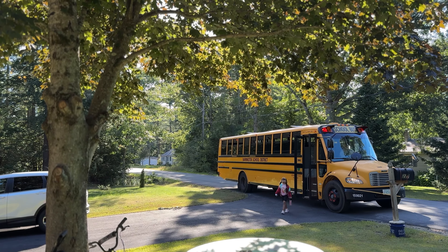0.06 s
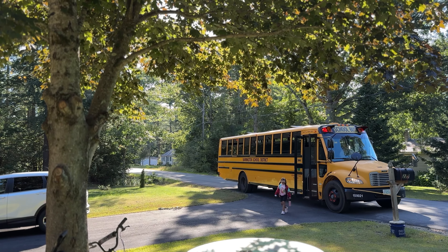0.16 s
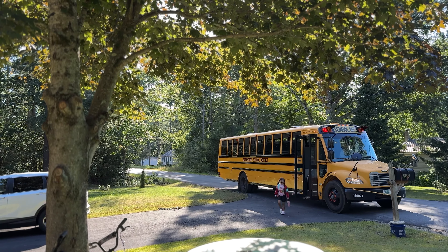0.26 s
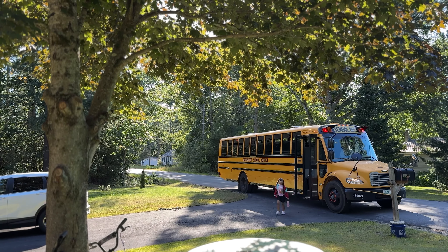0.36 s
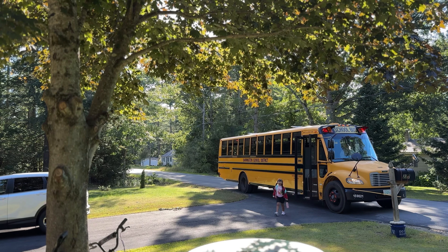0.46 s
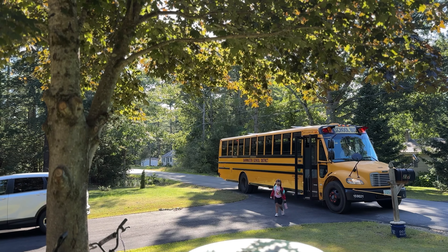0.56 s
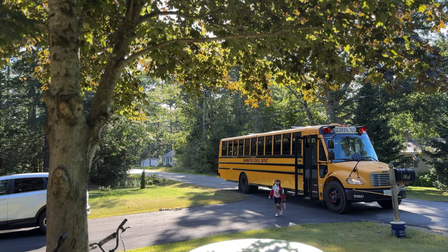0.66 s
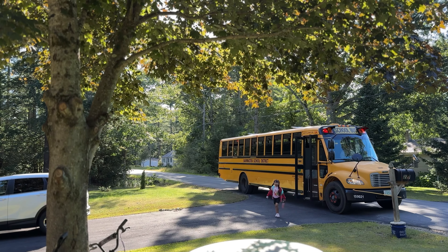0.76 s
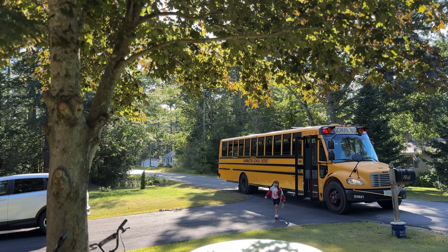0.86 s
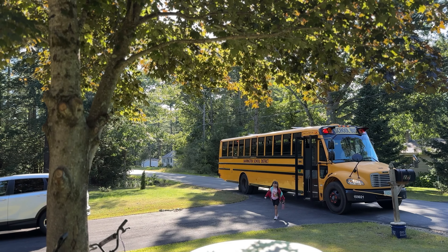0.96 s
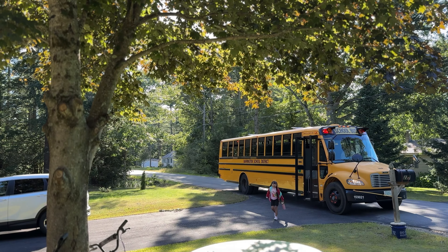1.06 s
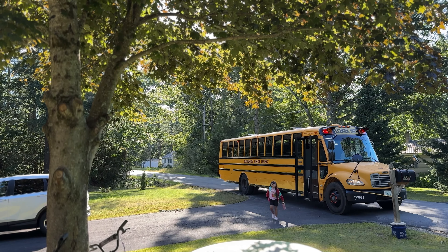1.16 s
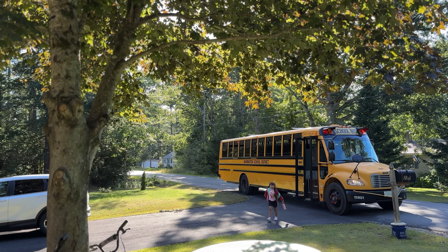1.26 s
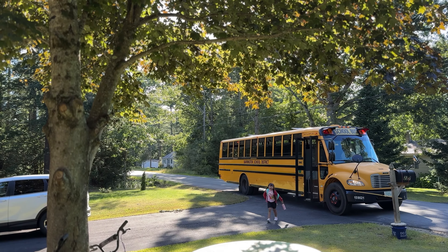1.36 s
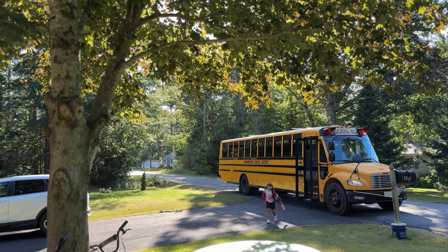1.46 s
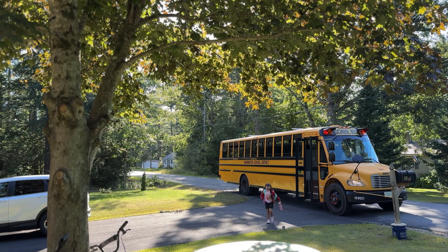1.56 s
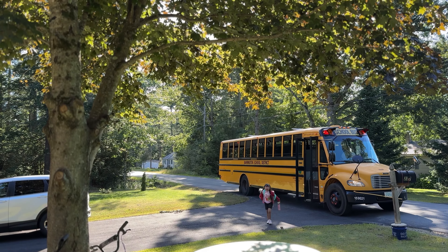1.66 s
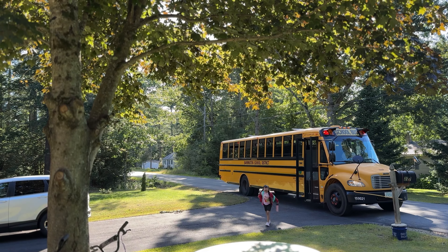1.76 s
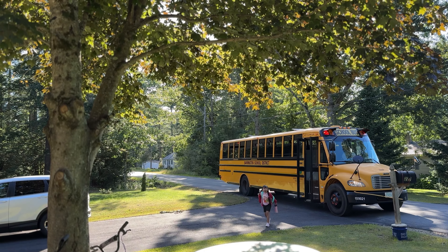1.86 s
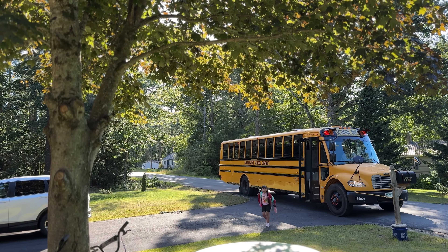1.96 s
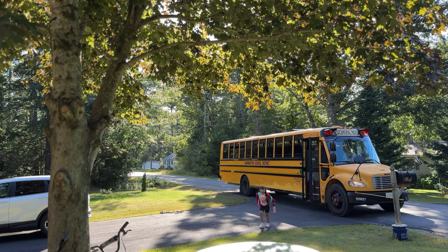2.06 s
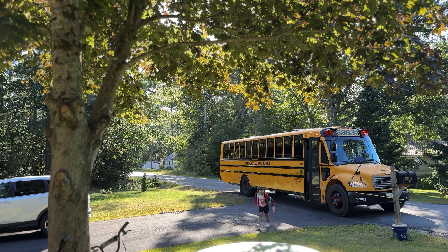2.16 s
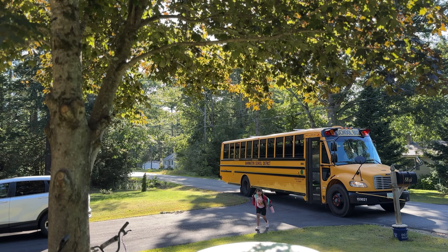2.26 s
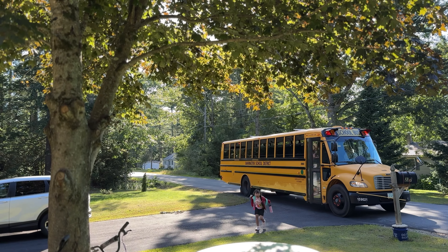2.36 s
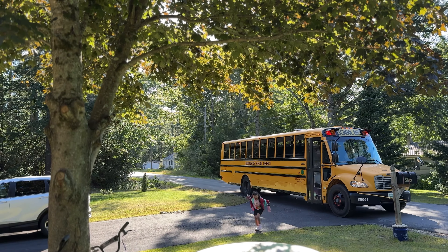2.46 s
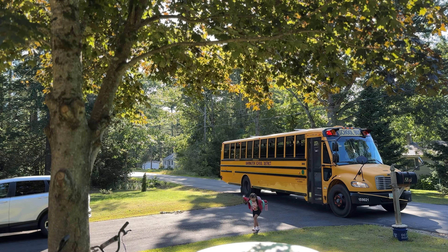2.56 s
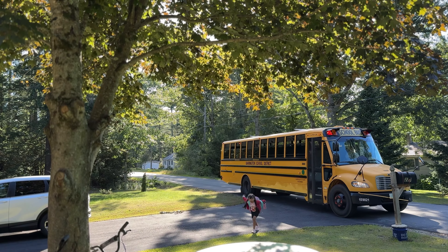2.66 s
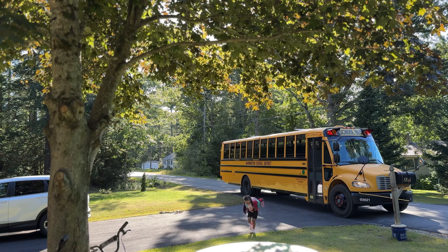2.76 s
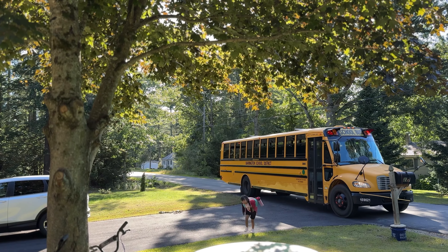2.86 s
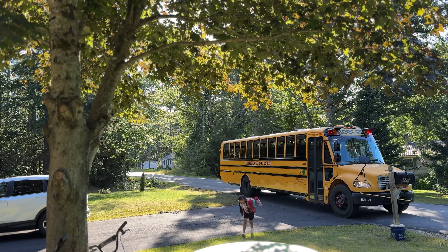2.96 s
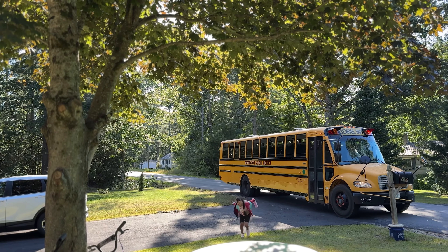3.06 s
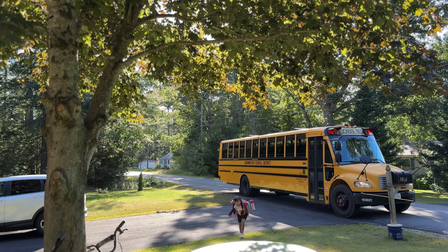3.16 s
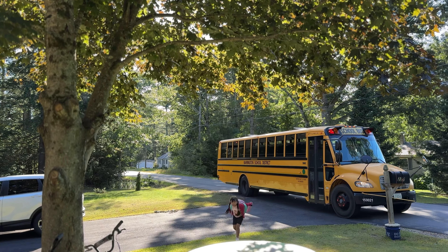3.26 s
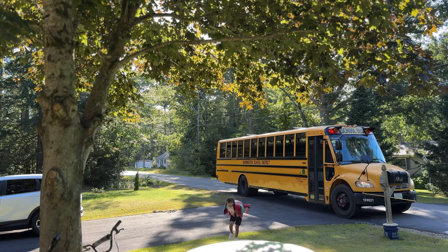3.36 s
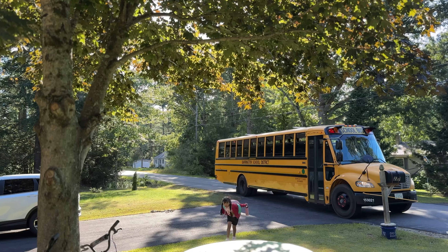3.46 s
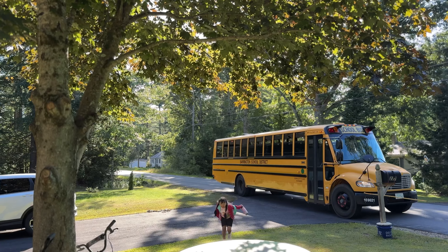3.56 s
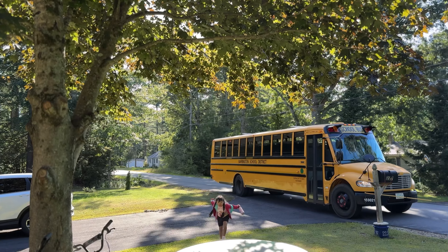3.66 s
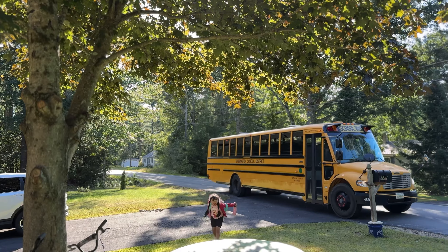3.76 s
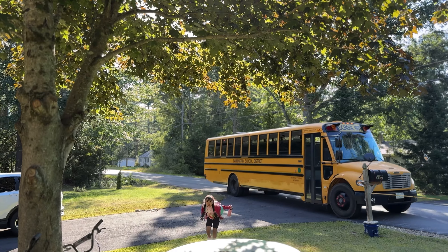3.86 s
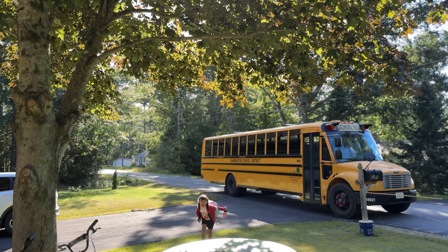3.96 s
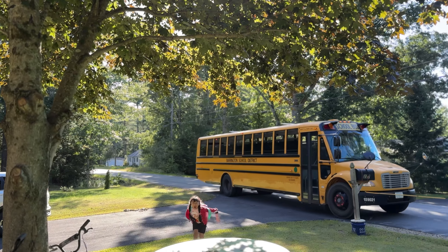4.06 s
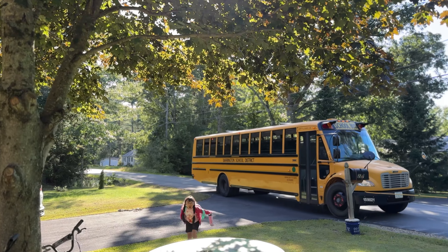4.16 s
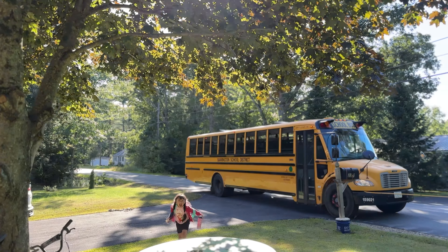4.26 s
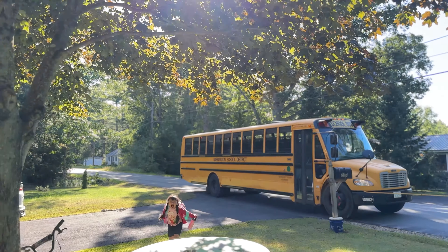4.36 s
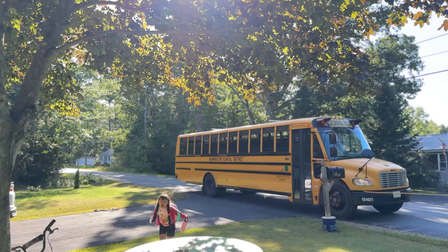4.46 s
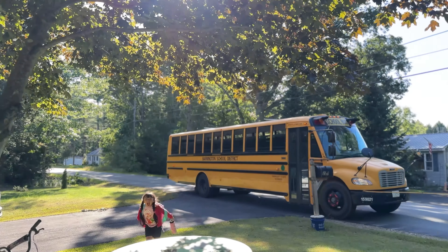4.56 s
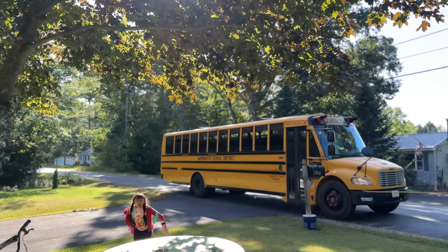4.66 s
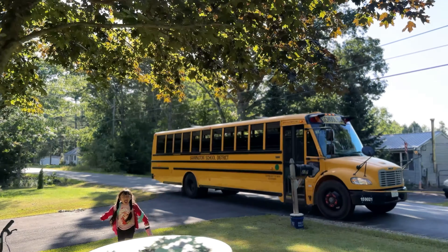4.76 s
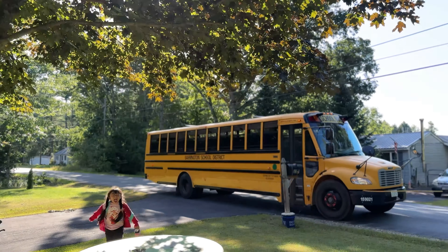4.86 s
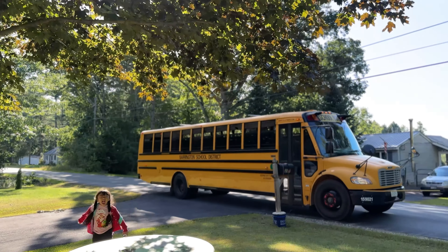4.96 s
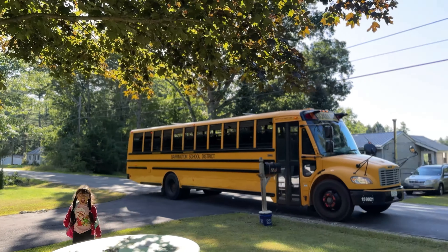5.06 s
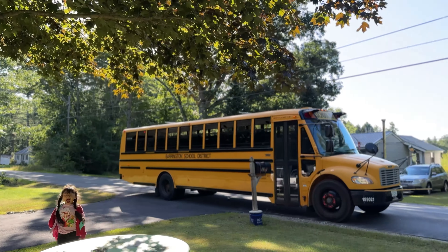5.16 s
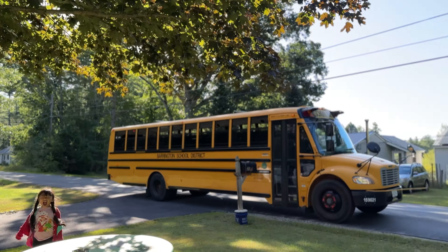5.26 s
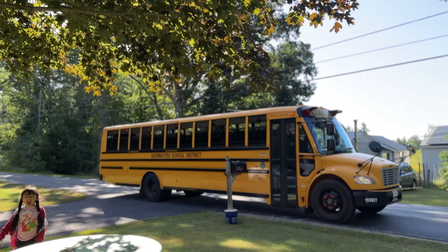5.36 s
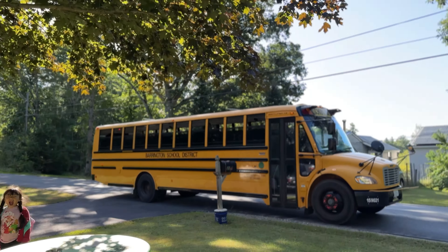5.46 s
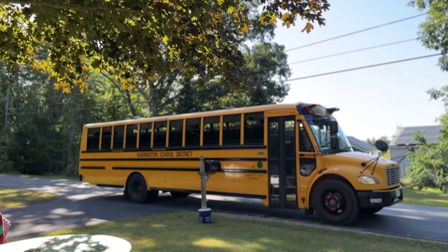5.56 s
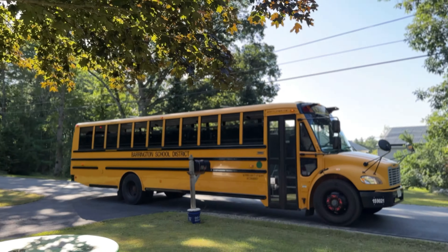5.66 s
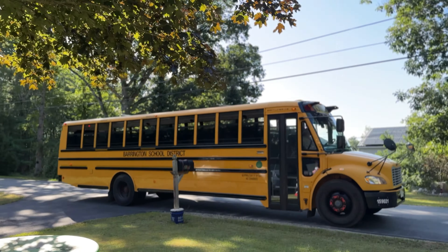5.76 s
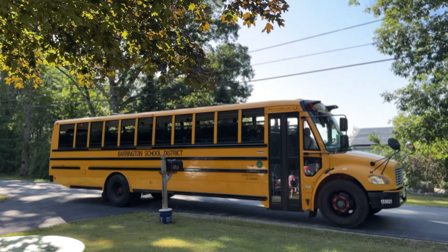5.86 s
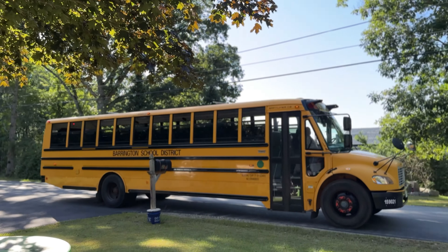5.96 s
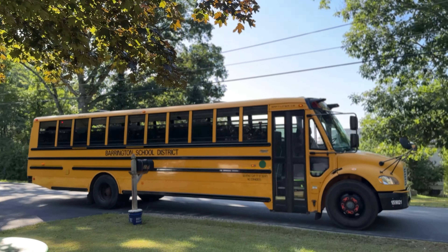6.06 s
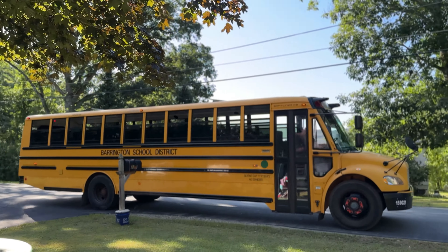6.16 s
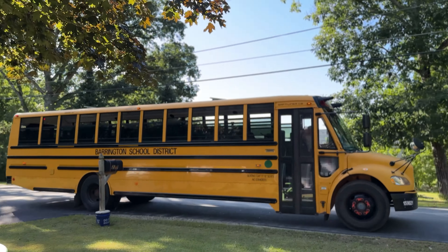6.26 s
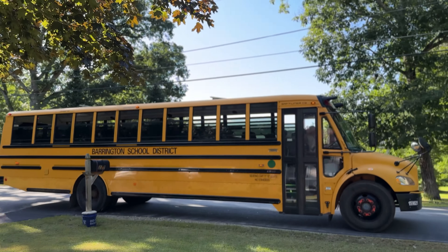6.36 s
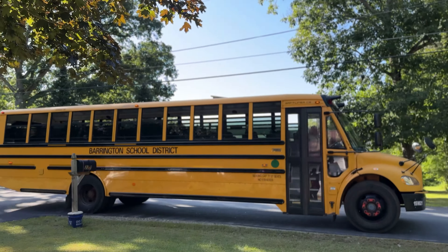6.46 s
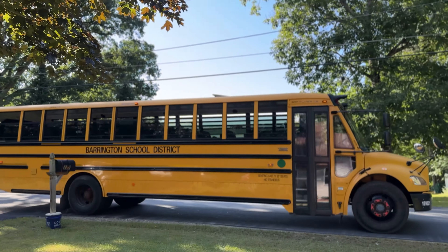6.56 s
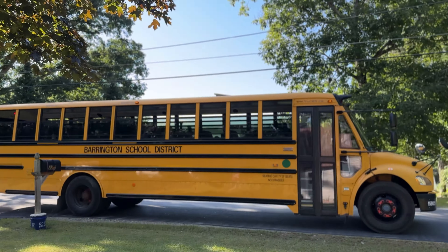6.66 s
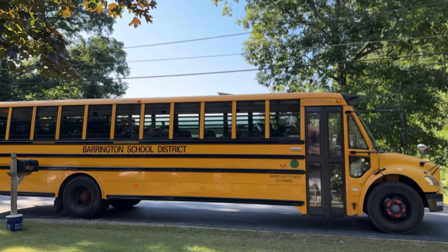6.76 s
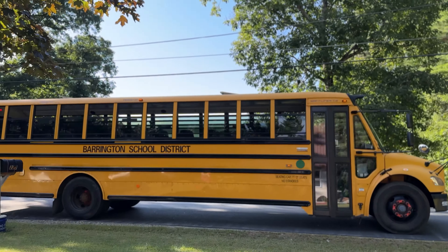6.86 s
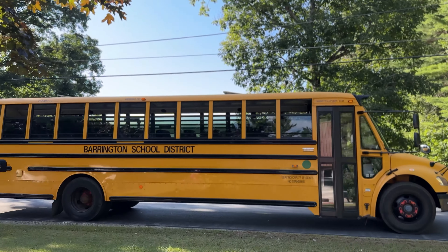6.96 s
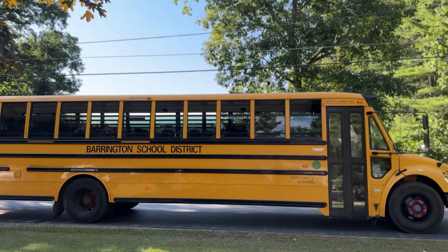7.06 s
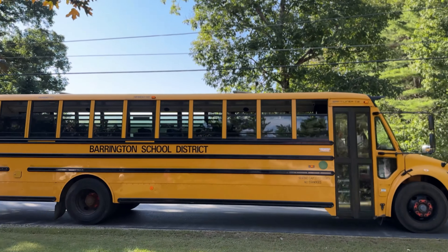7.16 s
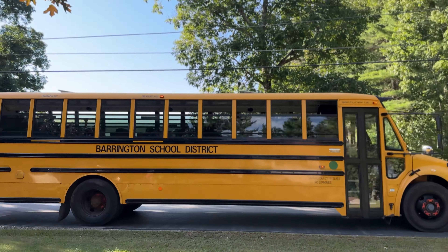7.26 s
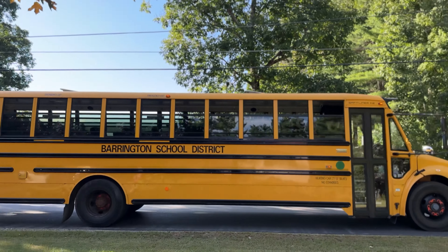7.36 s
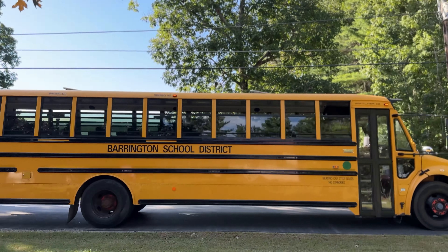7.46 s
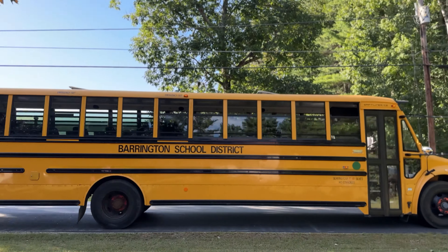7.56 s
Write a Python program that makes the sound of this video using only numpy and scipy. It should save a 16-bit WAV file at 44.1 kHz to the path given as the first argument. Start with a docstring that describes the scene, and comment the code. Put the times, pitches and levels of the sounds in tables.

```python
"""A loping diesel thump at a wooded roadside: a six-cylinder school bus idles, then pulls away and rolls past close by.
Throttle and one gear change set the crank's speed; the thumps, ringing modes, merge into a hum of engine orders.
Noise shaped by the firings makes a clatter, coloured by the block and combed by the road's echo.
Gear whines, a drive-shaft drone and brake squeaks are gliding tones; ticks and rushes of air are short noise.
The engine is heard in stereo, with a lag and likeness between left and right that depend on pitch."""
import sys
import numpy as np
from scipy import signal
from scipy.io import wavfile
from scipy.ndimage import uniform_filter1d

SR = 44100
rng = np.random.default_rng(int(sys.argv[2]) if len(sys.argv) > 2 else 0)


def pcm_store(signal):
    """Save signal as 16-bit PCM."""
    levels = np.round(np.clip(np.atleast_2d(signal), -1, 1) * 32767)
    wavfile.write(sys.argv[1], SR, levels.astype(np.int16).T)


N = 335160
TIME = np.arange(N) / SR
FRAME = 2048  # samples in a short-time spectrum
BINS = np.maximum(np.fft.rfftfreq(FRAME, 1 / SR), 1)  # Hz

IDLE_RPM = 750.8
# The driver pulls away, the gearbox shifts up, the driver presses on.
# Each row: start in seconds, change of speed in rpm, time it takes in seconds, climb afterwards in rpm per second.
THROTTLE = [(2.6, 494, .36, 143), (5.63, -154, .29, 26), (7.33, 110, .3, 26)]


def crank_rpm(at):
    """Each move of throttle or gearbox eases the crank to a new speed, from which it climbs steadily."""
    rpm, climb_before = IDLE_RPM, 0
    for start, change, taking, climb in THROTTLE:
        since = np.maximum(at - start, 0)
        eased = 1 - np.exp(-(since / taking) ** 1.6)
        rpm = rpm + change * eased + (climb - climb_before) * since
        climb_before = climb
    return rpm


# Thump of each cylinder at low speed, in firing order. Each row: lateness in seconds, kick in dB before the push.
THUMPS = [(.0005, 9), (.002, -3.5), (0, 3.9), (.0018, -5.1), (0, 5.2), (.0029, -9.5)]
# Ringing of exhaust and chassis. Each row: pitch in Hz, level for a 0 dB kick in dB, decay by 60 dB in seconds.
THUMP_MODES = [(68, -32.4, .096), (81, -21.9, .029), (89, -35.9, .147), (151, -34.9, .2),
               (153, -33.4, .037), (199, -34.3, .051), (183, -43.4, .3), (301, -42.3, .04),
               (319, -51.5, .35)]
# opening the throttle makes the thumps harder
THUMP_PUSH_DB, THUMP_PUSH_AT_S, THUMP_PUSH_TAKES_S = 5, 2.76, .06


def thumps(cycles, scatter_db=.3):
    """Six unequal firings kick the exhaust and chassis; their ringing overlaps in a lope."""
    number = np.arange(int(cycles[-1] * len(THUMPS)))
    late, db = np.take(THUMPS, number, axis=0, mode="wrap").T
    at = np.interp(number / len(THUMPS), cycles, TIME) + late
    db = db + THUMP_PUSH_DB * ease(at - THUMP_PUSH_AT_S, THUMP_PUSH_TAKES_S)
    db = db + scatter_db * rng.standard_normal(len(at))
    kicks = np.zeros(N + SR)
    kicks[(at * SR).astype(int)] = from_db(db) * (at > late)  # firings before the start are silent
    out = np.zeros(N)
    for k, (hz, level_db, t60) in enumerate(THUMP_MODES):
        out += (-1) ** k * from_db(level_db) * ring(kicks[:N], hz, t60)
    return out * np.sqrt(1 - merged())


def merged():
    """Share of power, rising from 0 to 1, that has passed from single thumps into a steady hum."""
    return ease(TIME - 2.946, .05)


# Level of the exhaust's firing tone once the bus drives. Each row: time in seconds, level in dB before rocking.
FIRING_TONE = [(3.1, -60), (3.42, -41), (4.43, -39.5), (5.13, -24), (5.69, -31), (5.73, -35), (5.9, -26),
               (6.4, -33.5), (7.14, -26), (7.55, -30)]
# The octave above it. Each row: time in seconds, level in dB before the trim and rocking.
FIRING_OCTAVE = [(3.1, -31), (3.76, -28), (3.95, -24), (5.64, -26), (5.88, -21.5), (6.54, -22.5),
                 (7.24, -30), (7.55, -22.5)]
OCTAVE_TRIM_DB = -1
IDLE_TONE_DB, IDLE_OCTAVE_DB = -66, -62
# the engine rocks on its mounts as the firing rate sweeps through their resonance
MOUNT_HZ, MOUNT_WIDTH_HZ, MOUNT_TONE_DB, MOUNT_OCTAVE_DB = 46, 5.3, 30, 13


def boom(rpm, state):
    """Levels of the firing tone and its octave: quiet at idle, booming from the exhaust under load."""
    load = np.minimum(state, 1)
    (tone,), (octave,) = in_time(FIRING_TONE), in_time(FIRING_OCTAVE)
    firing_hz = rpm / 120 * 6  # six firings in each four-stroke cycle
    rocking = bell(firing_hz - MOUNT_HZ, MOUNT_WIDTH_HZ)
    tone_db = (1 - load) * IDLE_TONE_DB + load * tone
    octave_db = (1 - load) * IDLE_OCTAVE_DB + load * (octave + OCTAVE_TRIM_DB)
    return tone_db + MOUNT_TONE_DB * rocking, octave_db + MOUNT_OCTAVE_DB * rocking


# The other engine orders. Each row: multiple of the four-stroke cycle rate, then the level in dB
# revving up, pulling, alongside and in second gear, before the share that has merged.
ORDER_DB = [(5, -65, -65, -52, -62), (7, -64, -56, -43, -55), (8, -55, -52, -42, -43),
            (9, -48, -36, -39, -43), (10, -50, -48, -40, -35.5), (11, -44, -43, -40, -43),
            (13, -52, -46, -41, -42), (14, -50, -50, -50, -43), (15, -36, -33, -36, -36),
            (16, -52, -58, -38, -40), (17, -54, -47, -54, -42), (18, -37, -35, -42, -35.5),
            (20, -58, -48, -46, -45), (21, -46, -44, -34, -42), (23, -49, -41, -43, -56),
            (24, -47, -39, -43, -38), (26, -60, -53, -53, -47), (27, -46, -47, -47, -44),
            (28, -53, -56, -44, -47), (30, -53, -48, -48, -50), (32, -58, -45, -46, -55),
            (34, -56, -43, -50, -48), (36, -56, -45, -52, -52), (40, -45, -54, -58, -53),
            (48, -60, -58, -50, -53), (54, -58, -52, -49, -58), (60, -62, -58, -54, -52),
            (63, -62, -54, -55, -54), (66, -62, -55, -52, -55), (72, -60, -53, -47, -52),
            (84, -54, -49, -62, -62)]
# When the engine is at those four stages, in seconds.
STAGES_S = [3.2, 3.9, 5.3, 6.6]
# unevenness of combustion, as a share of each order's level
IDLE_WAVER, LOAD_WAVER, BOOM_WAVER = .08, .2, .05


def hum(cycles, rpm, state):
    """Engine orders locked to the crank; uneven combustion makes them waver, more so under load."""
    waver, share = np.interp(state, [0, 1], [IDLE_WAVER, LOAD_WAVER]), np.sqrt(merged())
    lines = [(k, share * from_db(np.interp(TIME, STAGES_S, db)), waver) for k, *db in ORDER_DB]
    lines += [(k, from_db(db), BOOM_WAVER) for k, db in zip((6, 12), boom(rpm, state))]
    out = np.zeros(N)
    for order, gain, w in lines:
        angle = 2 * np.pi * (order * cycles + rng.random())
        out += gain * ((1 + w * drift(3.2)) * np.cos(angle) + w * drift(3.9) * np.sin(angle))
    return np.sqrt(2) * out


# Knock of each cylinder, in firing order: strength in dB before scatter and the scaling by load.
CYLINDER_DB = [-8, -11, -8.5, 0.5, -7, -7]
IDLE_KNOCK, LOAD_KNOCK, SCATTER_DB = 1.1, .7, 2.2
KNOCK_DECAY = .22  # in firing intervals
RUSH_SHARE = .35  # how strongly the rush follows the knock
RECURRING, REPEAT_HZ = .8, 4500  # share of power that recurs, and the pitch where it has halved


def clatter(cycles, state, size=4096):
    """Each firing shakes out a rattle that recurs in every cycle, over a rush that pulses only gently."""
    firings = cycles * len(CYLINDER_DB)
    number = np.floor(firings).astype(int)
    scatter = SCATTER_DB * rng.standard_normal(number.max() + 1)[number]
    strength = from_db(np.take(CYLINDER_DB, number, mode="wrap") + scatter)
    loading = np.interp(state, [0, 1], [IDLE_KNOCK, LOAD_KNOCK])
    knock = loading * strength * np.exp(-(firings % 1) / KNOCK_DECAY)
    # one cycle of noise, replayed by crank angle, so it rises in pitch with the crank
    rattle = np.interp(cycles % 1 * size, np.arange(size), rng.standard_normal(size))
    rattle = rattle / np.sqrt(np.gradient(cycles) * size)
    rush, diffuse = frames(steady(1 + RUSH_SHARE * knock) * rng.standard_normal((2, N)))
    # the rattle lies between the hum and the treble
    hz = BINS[:, None]
    share = RECURRING / (1 + (hz / REPEAT_HZ) ** 2) * (hz > 540)
    direct = np.sqrt(1 - share) * rush + np.sqrt(share) * frames(steady(1 + knock) * rattle)
    return direct, diffuse


# State of the bus. Each row: time in seconds, 0 idling / 1 pulling away / 2 alongside.
STATE = [(0, 0.015), (2.6, 0.043), (3.2, 0.88), (3.6, 1.17), (4.4, 1.62), (5.3, 2), (7.6, 1.68)]
# Low rumble before the resonances. Each row: pitch in Hz, idling, pulling and alongside level in dB per Hz.
LOW_COLOUR = [(30, -95, -88, -82), (40, -67.5, -69, -66.5), (70, -69, -64, -61), (110, -69, -58.5, -53),
              (175, -68, -61, -56), (230, -67, -63, -57)]
# Clatter before the resonances. Each row: pitch in Hz, idling, pulling and alongside level in dB per Hz.
COLOUR = [(302, -69.5, -68.5, -58), (385, -71, -62, -56), (492, -72.5, -69, -65), (620, -84.5, -73, -66.5),
          (930, -78.5, -70.5, -62.5), (1430, -86.5, -69, -67), (3030, -94.5, -82.5, -75.5),
          (5740, -91, -83, -78.5), (7900, -99, -88.5, -84), (13700, -106, -98.5, -91.5)]
# A broad hiss in the treble: pitch in Hz, width in Hz, height in dB.
TREBLE_HISS = (8000, 700, 3.0)
# Resonances of block and bonnet. Each row: pitch in Hz, width in Hz, idling, pulling and alongside height in dB.
BLOCK = [(323, 22, 2, 4, 3.5), (1112, 69, 6.5, 1, -1.5), (1350, 69, 4, -15, -4), (1878, 84, 9.5, 1.5, 4.5),
         (2040, 46, 10.5, -1, 7.5), (2568, 195, 11, 1.5, 8), (3433, 250, 6.5, 5.5, 5),
         (4390, 410, 7.5, 4, 4)]
# Resonances that come into earshot with the rear of the bus. Each row: pitch in Hz, width in Hz, height in dB.
REAR = [(323, 32, 9), (577, 31, 5), (1250, 140, 5.5)]
REAR_AT_S, REAR_TAKES_S = 7.03, .17
# the exhaust's deep rumble swells with its firing tone (dB per dB about the tone's mean level)
RUMBLE_HZ, RUMBLE_WIDTH_HZ, RUMBLE_FOLLOWS = 60.7, 20, .58


def engine_body(count):
    """Gain by pitch and time: the block's resonances, heard from a changing side as the bus comes by."""
    at = np.arange(count) * FRAME / 2 / SR
    hiss_hz, hiss_width, hiss_db = TREBLE_HISS
    colours = by_pitch(LOW_COLOUR + COLOUR) + hiss_db * bell(BINS - hiss_hz, hiss_width)
    for hz, width, *db in BLOCK:
        colours = colours + np.outer(db, bell(BINS - hz, width))
    state, = in_time(STATE, at)
    blend = np.array([np.interp(state, [0, 1, 2], one) for one in np.eye(3)])
    level_db = colours.T @ blend + effort_db(at)
    level_db += humps(REAR) * ease(at - REAR_AT_S, REAR_TAKES_S)
    tone, = in_time(FIRING_TONE, at)
    swell_db = RUMBLE_FOLLOWS * (tone - np.mean(tone[state > 1])) * np.clip(state - 1, 0, 1)
    level_db += np.outer(bell(BINS - RUMBLE_HZ, RUMBLE_WIDTH_HZ), swell_db)
    return from_db(level_db) * road_echo(at, state) * np.sqrt(SR / 2)  # from dB per Hz to unit noise


# The growl changes colour as the crank speeds up. Each row: pitch in Hz, width in Hz, greatest height in dB.
STRAIN = [(260, 23, 5.5), (467, 79, 7.5), (4130, 200, 5.5)]
STRAIN_RELAX_S = .27
# the clatter hardens at the top of the speed range
HARD_ABOVE_RPM, HARD_DB_PER_RPM, HARD_HZ, HARD_WIDTH_HZ = 1350, .0025, 3440, 1600


def effort_db(at):
    """Decibels by pitch and time that acceleration and high speed add to the engine's noise."""
    rpm = crank_rpm(at)
    speeding_up = np.maximum(np.gradient(rpm), 0)
    strain = signal.lfilter([1], [1, -np.exp(-at[1] / STRAIN_RELAX_S)], speeding_up)
    hardening = HARD_DB_PER_RPM * np.maximum(rpm - HARD_ABOVE_RPM, 0)
    return humps(STRAIN) * strain / strain.max() + np.outer(bell(BINS - HARD_HZ, HARD_WIDTH_HZ), hardening)


# A bright band of the clatter slides down, with small returns, as the bus turns its side.
# Each row: time in seconds, pitch in Hz, height in dB once the bus moves.
SLIDING = [(3.1, 1180, 5.5), (4.4, 1150, 3.5), (5.0, 970, 4.5), (5.4, 782, 2), (5.75, 795, 0.5),
           (6.0, 890, 0.5), (6.5, 750, 1), (6.9, 770, 3.5), (7.6, 660, 0.5)]
SLIDING_WIDTH_HZ = 115
ECHO_GAIN, ECHO_FAR_S, ECHO_NEAR_S = .3, .001145, .00149
ECHO_DULL_HZ = 5000  # the rough road scatters the treble, so its echo is dull
NEARING_AT_S, NEARING_TAKES_S = 4.92, .32


def road_echo(at, state):
    """The bounce off the open road lags more as the bus nears, so a comb slides down through the clatter."""
    lag = ECHO_FAR_S + (ECHO_NEAR_S - ECHO_FAR_S) * ease(at - NEARING_AT_S, NEARING_TAKES_S)
    moving, hz = np.minimum(state, 1), BINS[:, None]
    centre_hz, height_db = in_time(SLIDING, at)
    sliding_db = height_db * moving * bell(hz - centre_hz, SLIDING_WIDTH_HZ)
    bounce = ECHO_GAIN * bell(hz, ECHO_DULL_HZ) * moving * np.exp(-2j * np.pi * hz * lag)
    return np.abs(1 + bounce) * from_db(sliding_db)


# Ringing of the block under a hard knock. Each row: pitch in Hz, relative level in dB, decay by 60 dB in seconds.
KNOCK_MODES = [(1650, -1, .018), (2480, -2, 0.018), (3450, -5, .012), (4230, -10, 0.012)]
# Strength of those knocks before scatter. Each row: time in seconds, level in dB.
KNOCK_LEVEL = [(2.6, -45), (3.3, -40), (4.1, -39), (4.5, -33), (5.5, -33), (6.3, -37), (7.6, -38)]
KNOCK_CHANCE = .3  # per firing


def knocks(cycles, jitter_s=.0008, scatter_db=3):
    """Some firings, chosen by chance, strike each mode of the block with a strength of its own."""
    firings = np.arange(cycles[0], cycles[-1], 1 / len(CYLINDER_DB))
    hard = firings[rng.random(len(firings)) < KNOCK_CHANCE]
    at = np.interp(hard, cycles, TIME) + np.abs(rng.normal(0, jitter_s, len(hard)))
    level_db, = in_time(KNOCK_LEVEL, at)
    out = np.zeros(N)
    for hz, db, t60 in KNOCK_MODES:
        kicks = np.zeros(N + SR)
        kicks[(at * SR).astype(int)] = from_db(level_db + db + rng.normal(0, scatter_db, len(at)))
        out += ring(kicks[:N], hz, t60)
    return out


# A belt-driven accessory's whine. Each row: time in seconds, level in dB before flutter.
WHINE = [(3.1, -64), (3.3, -43), (3.55, -40), (3.7, -48), (3.92, -56), (4.15, -40.5), (4.55, -45.5),
         (4.8, -54), (5.6, -53), (5.85, -44.5), (6.1, -55), (6.45, -45.5), (6.8, -56), (7.6, -58)]
WHINE_ORDER = 90.4  # multiple of the four-stroke cycle rate
WHINE_FLUTTER_DB = 1.0


def whine(cycles, slip=.45, rough=.3):
    """The belt slips (radians) and shudders, so the whine follows the crank loosely; it swells and fades."""
    level = from_db(in_time(WHINE)[0] + WHINE_FLUTTER_DB * drift(2.2))
    level = level * merged() * (1 + rough * drift(35))
    return np.sqrt(2) * level * np.sin(2 * np.pi * WHINE_ORDER * cycles + slip * drift(9.0))


# The drive shaft climbs in first gear and beats against the firing tone.
# Each row: time in seconds, pitch in Hz, level in dB.
SHAFT = [(4.15, 42, -93), (4.33, 46.3, -46), (4.55, 50.5, -46), (4.7, 54, -55), (4.9, 60, -36),
         (5.05, 64, -42), (5.25, 67.9, -30), (5.45, 70.3, -36), (5.65, 75, -36), (5.95, 77, -90)]


def shaft():
    """A low drone that climbs as the wheels gather speed."""
    hz, db = in_time(SHAFT)
    return np.sqrt(2) * from_db(db) * np.sin(2 * np.pi * np.cumsum(hz) / SR)


# Brake squeaks, in bursts that draw closer together, and brief whines of the gear train. Each row: start in
# seconds, length in seconds, start pitch in Hz, end pitch in Hz, level in dB before flutter, roughness 0-1.
SQUEAKS = [(4.15, .075, 6960, 6945, -47, .15), (4.24, .09, 6900, 6945, -44.5, .15),
           (4.35, .06, 6960, 7000, -48, .15), (5.38, .09, 6880, 6940, -44, .25),
           (5.48, .085, 6920, 6950, -43.5, .2), (6.16, .055, 6960, 6930, -47, .2),
           (6.22, .12, 6870, 6885, -45, .25), (6.95, .18, 6790, 6875, -41.5, .1),
           (7.365, .075, 6840, 6750, -38.5, .2)]
GEAR_WHINES = [(3.56, .24, 962, 988, -41, .3), (3.97, .3, 1022, 998, -45, .4),
               (5.08, .24, 1012, 988, -37, .5), (5.33, .24, 892, 872, -36.5, .55),
               (5.48, .32, 738, 716, -38, .6), (5.63, .28, 1004, 960, -43, .6),
               (5.74, .22, 546, 524, -39, .35), (5.84, .22, 858, 908, -35, .55),
               (6.05, .22, 936, 920, -43, .4)]


def singing(rows, wobble_hz=10, flutter_db=1.5, edge_s=.02):
    """A grazing brake pad or meshing gears: each row is one unsteady, gliding tone."""
    out = np.zeros(N)
    wobble, flutter = drift(35), from_db(flutter_db * drift(20))
    grit = (drift(70) + 1j * drift(70)) / np.sqrt(2)
    for start, length, from_hz, to_hz, db, rough in rows:
        on = (TIME > start) & (TIME < start + length)
        age = TIME[on] - start
        pitch = from_hz + (to_hz - from_hz) * age / length + wobble_hz * wobble[on]
        turning = np.exp(2j * np.pi * np.cumsum(pitch) / SR)
        tone = ((1 - rough + rough * grit[on]) * turning).real
        fade = np.clip(np.minimum(age, length - age) / edge_s, 0, 1)
        out[on] += from_db(db) * flutter[on] * tone * fade
    return out


# Small ticks, a surge as the bus sets off and a rush of air during the gear change. Each row: start in seconds,
# peak level in dB, rise in seconds, decay in seconds, low edge in Hz, high edge in Hz.
TICKS = [(.086, -43.5, 0.0028, 0.015, 2800, 8400), (1.7, -46, 0.0023, 0.012, 4800, 10600),
         (4.3, -46, .003, 0.014, 5300, 11000), (3.12, -38, .04, 0.07, 370, 1200),
         (5.72, -35, 0.335, 0.025, 2300, 4460)]


def ticks():
    """Bright spits and rushes of air: band-limited noise that rises, then dies away."""
    out = np.zeros((2, N))
    for start, db, rise, decay, low_hz, high_hz in TICKS:
        age = TIME - start
        level = from_db(db) * np.clip(age / rise, 0, 1) * np.exp(-np.maximum(age - rise, 0) / decay)
        band = signal.butter(2, [low_hz, high_hz], "band", fs=SR, output="sos")
        hiss = signal.sosfilt(band, rng.standard_normal((2, N)))
        out += level * hiss / hiss.std()
    return out


def air(count, patchy_db=1.5, size=16):
    """Moving air and shifting echoes make each band flicker a little on its own."""
    at = np.minimum(np.arange(count) * FRAME // 2, N - 1)
    flicker = [drift(21.0)[at] for _ in range(size)]
    bands = np.column_stack([np.geomspace(400, 15000, size), flicker])
    return from_db(patchy_db * by_pitch(bands).T)


# The stereo picture of the engine. Each row: pitch in Hz, likeness of the two sides 0-1,
# lag of the left in radians, left above right in dB.
PAIR = [(60, .995, .037, .3), (160, 1, .25, 0), (345, .99, .36, .5), (800, .9, .89, -3.5),
        (1170, .82, 1.43, -.5), (1880, .76, 1.4, -4), (4200, .72, 1.3, .5), (5500, .65, 1.94, 3),
        (7850, .78, 1.38, -2.5), (14000, .86, 1.7, 1)]


def stereo(direct, diffuse):
    """The left lags the right by pitch; a diffuse part of the engine noise differs between left and right."""
    alike, lag, pan_db = by_pitch(PAIR)[:, :, None]
    alike, side = np.clip(alike, 0, 1), np.array([1, -1])[:, None, None]  # left, right
    ears = np.sqrt((1 + alike) / 2) * direct + side * np.sqrt((1 - alike) / 2) * diffuse
    ears = ears * np.exp(-.5j * side * lag) * from_db(side * pan_db / 2)
    return signal.istft(ears, nperseg=FRAME)[1][:, :N]


def from_db(db):
    """Decibels to gain."""
    return 10 ** (np.asarray(db) / 20)


def in_time(rows, at=TIME):
    """Each column of a curve, joined by straight lines."""
    s, *columns = np.transpose(rows)
    return [np.interp(at, s, c) for c in columns]


def by_pitch(rows):
    """Each column of a spectrum, joined on a log-frequency axis."""
    hz, *columns = np.transpose(rows)
    return np.array([np.interp(np.log(BINS), np.log(hz), c) for c in columns])


def drift(rate):
    """Random wander with spread 1: noise through a two-pole low-pass at the rate in Hz."""
    step = 100  # samples between drawn values
    r = np.exp(-2 * np.pi * rate * step / SR)
    slow = signal.lfilter([1], [1, -2 * r, r * r], rng.standard_normal(N // step + 1002))[1000:]
    return np.interp(np.arange(N) / step, np.arange(len(slow)), slow / slow.std())


def frames(x):
    """Short-time spectrum."""
    return signal.stft(x, nperseg=FRAME)[2]


def bell(offset, width):
    """A smooth hump of height 1."""
    return np.exp(-.5 * (offset / width) ** 2)


def humps(rows):
    """Decibels by pitch of a set of broad resonances, as a column."""
    return sum(db * bell(BINS[:, None] - hz, width) for hz, width, db in rows)


def ease(offset, taking):
    """A smooth step from 0 to 1."""
    return .5 + .5 * np.tanh(offset / (2 * taking))


def steady(gain):
    """Keeps the beat of a gain but evens out its mean power over a third of a second."""
    return gain / np.sqrt(uniform_filter1d(gain ** 2, size=SR // 3))


def ring(kicks, hz, t60):
    """A unit kick sets a decaying sine of height 1 ringing."""
    r, w = np.exp(-np.log(1000) / (t60 * SR)), 2 * np.pi * hz / SR
    # the tiny offset keeps the filter clear of very small, slow numbers
    return signal.lfilter([0, np.sin(w)], [1, -2 * r * np.cos(w), r * r], kicks + 1e-18)


def scene(first_thud_s=.018):
    """One crank angle drives thumps, hum, whine, knocks and clatter; drive line, brake and ticks sound on top."""
    rpm, (state,) = crank_rpm(TIME), in_time(STATE)
    cycles = np.cumsum(rpm) / 120 / SR  # two turns of the crank make one four-stroke cycle
    cycles = cycles - np.interp(first_thud_s, TIME, cycles) + 1
    direct, diffuse = clatter(cycles, state)
    count = direct.shape[1]
    body = engine_body(count) * air(count)
    crank = thumps(cycles) + hum(cycles, rpm, state) + whine(cycles) + knocks(cycles)
    tones = frames(crank + shaft() + singing(GEAR_WHINES))
    engine = stereo(body * direct + tones, body * diffuse)
    brake = singing(SQUEAKS) * from_db([[-0.5], [0.5]])  # slightly to the right
    return engine + brake + ticks()


def record(dry):
    """The microphone drops the bass below 31 Hz; the top is cut at 15.1 kHz."""
    thin = signal.sosfilt(signal.butter(6, 31, "high", fs=SR, output="sos"), dry)
    return signal.sosfilt(signal.ellip(10, .1, 80, 15100, fs=SR, output="sos"), thin)


dry = scene()
out = record(dry)
pcm_store(out)
```